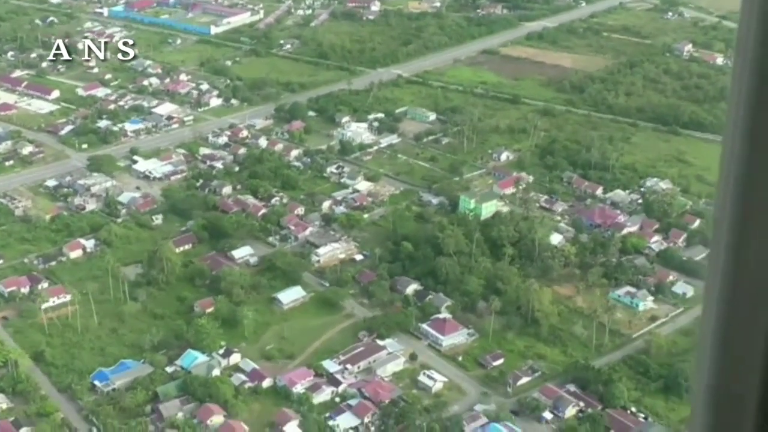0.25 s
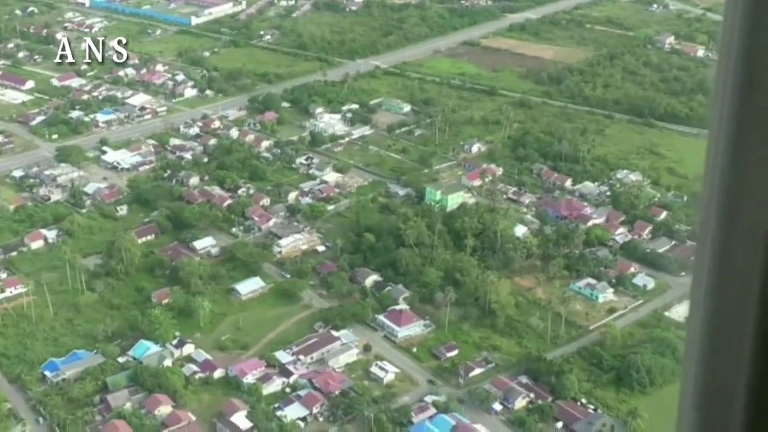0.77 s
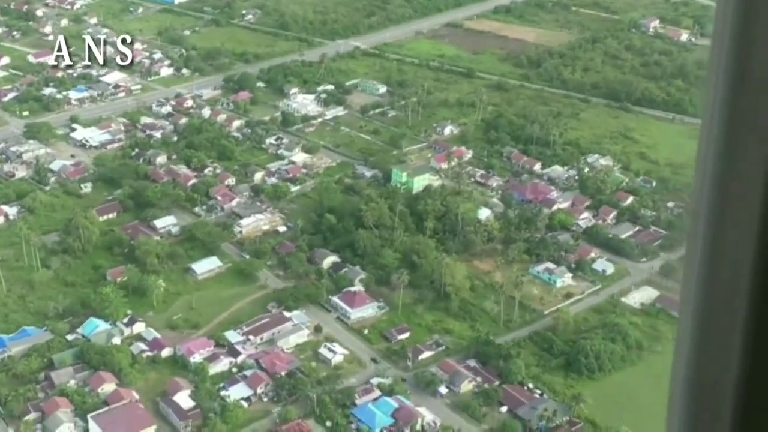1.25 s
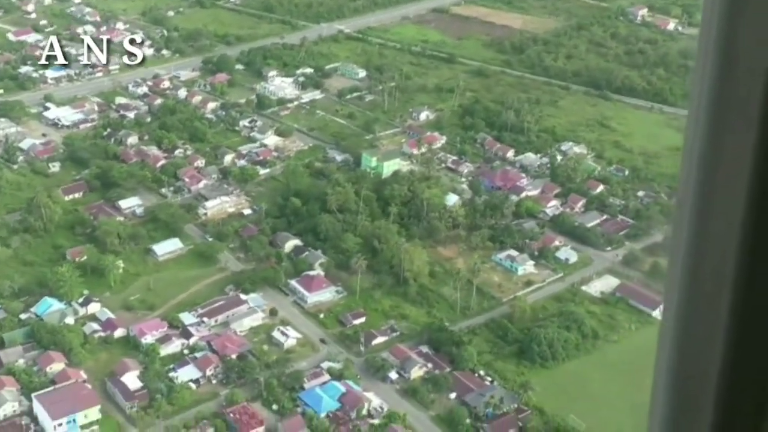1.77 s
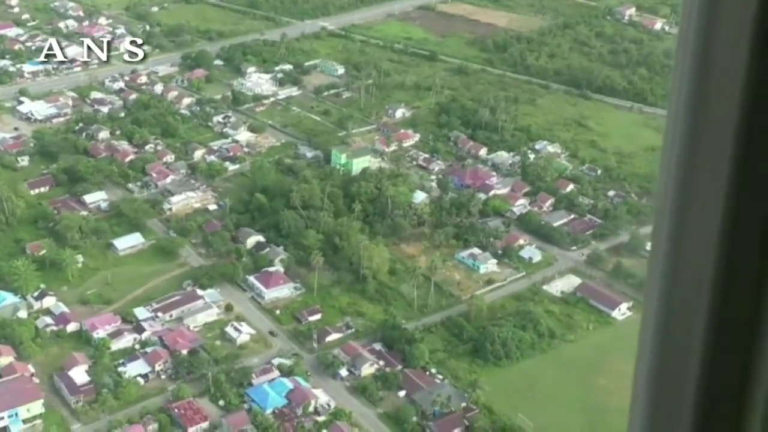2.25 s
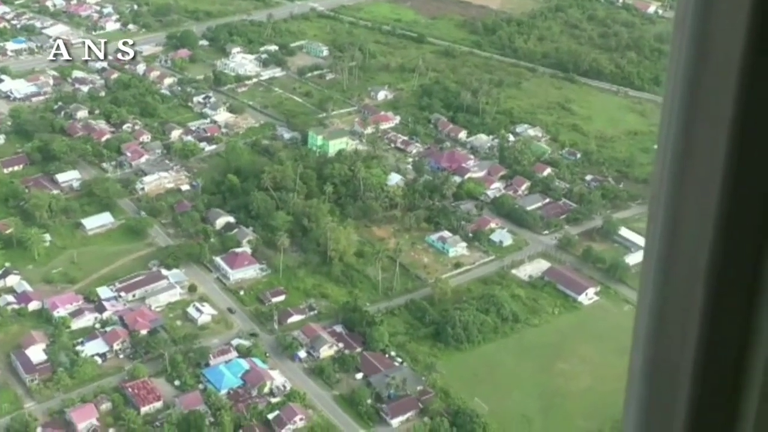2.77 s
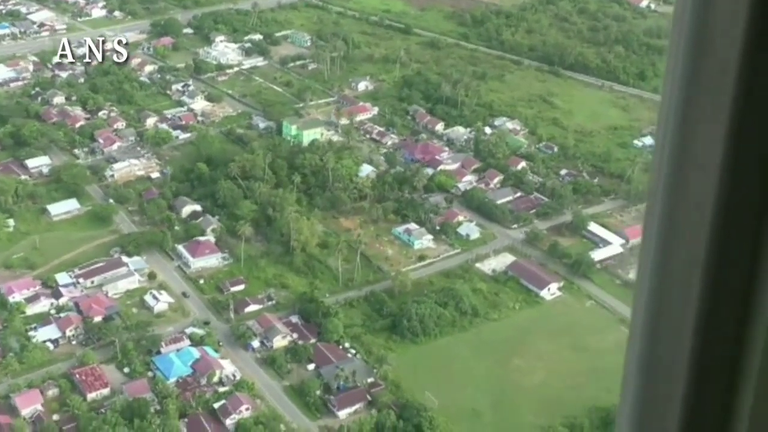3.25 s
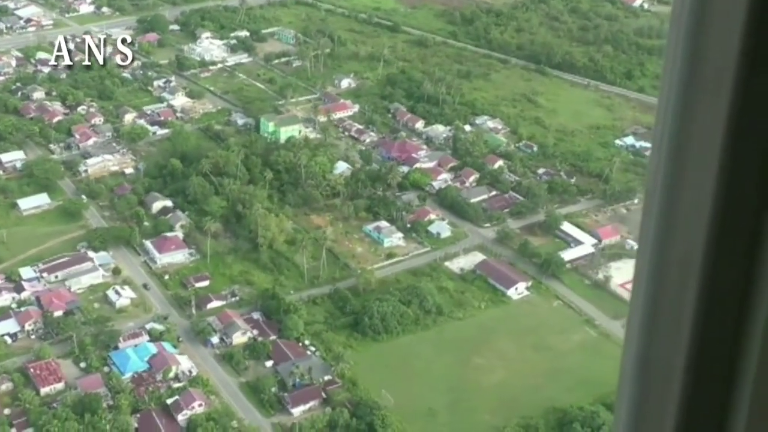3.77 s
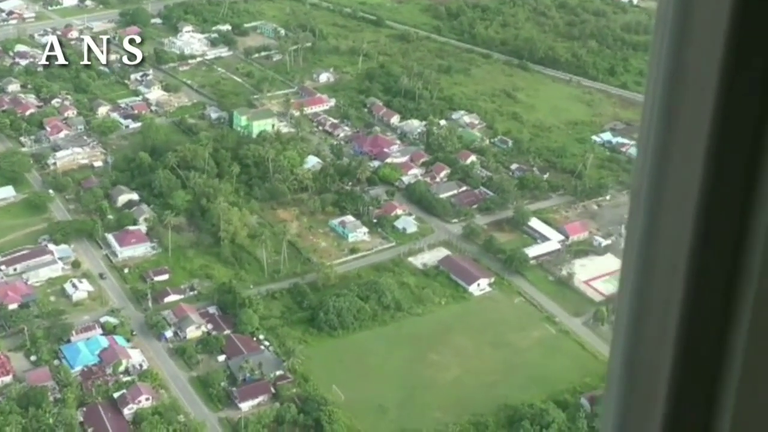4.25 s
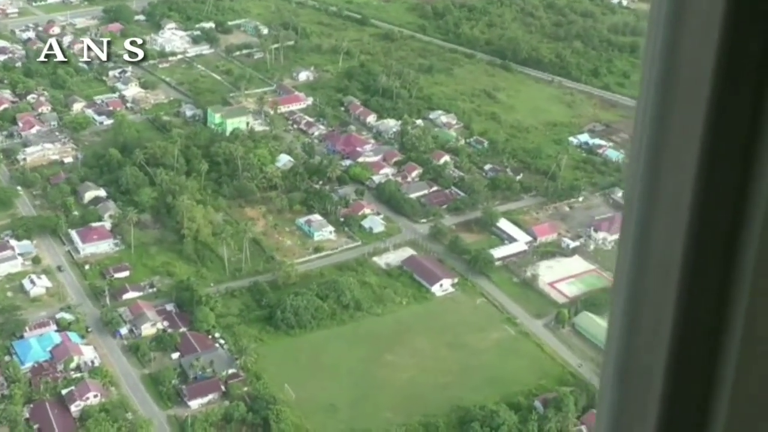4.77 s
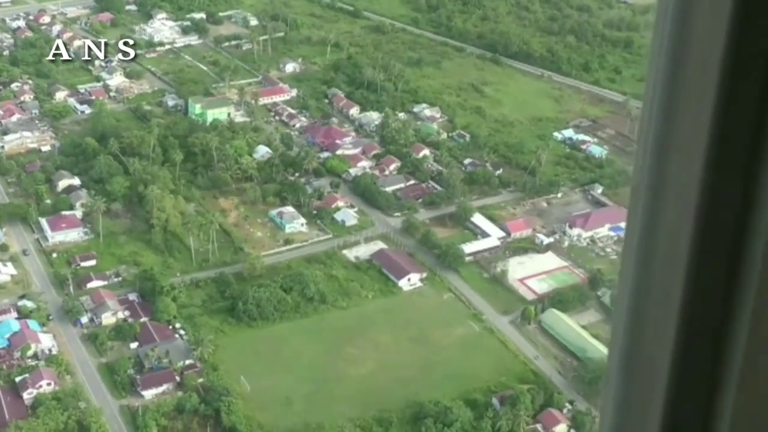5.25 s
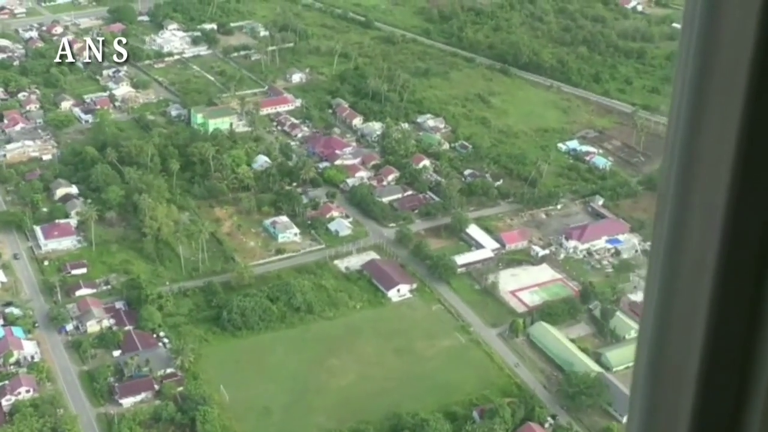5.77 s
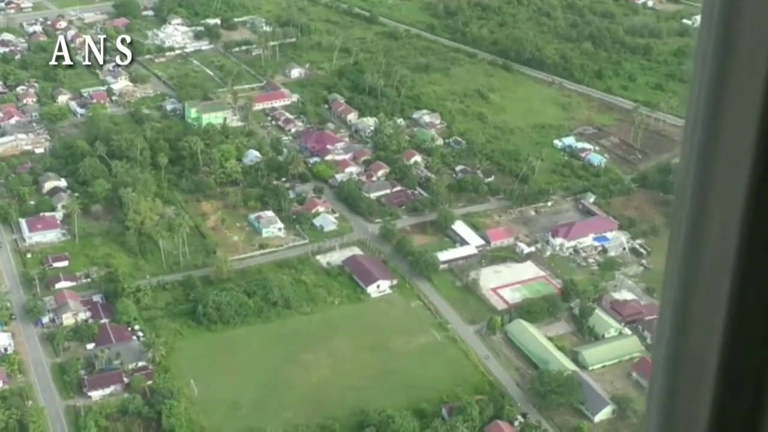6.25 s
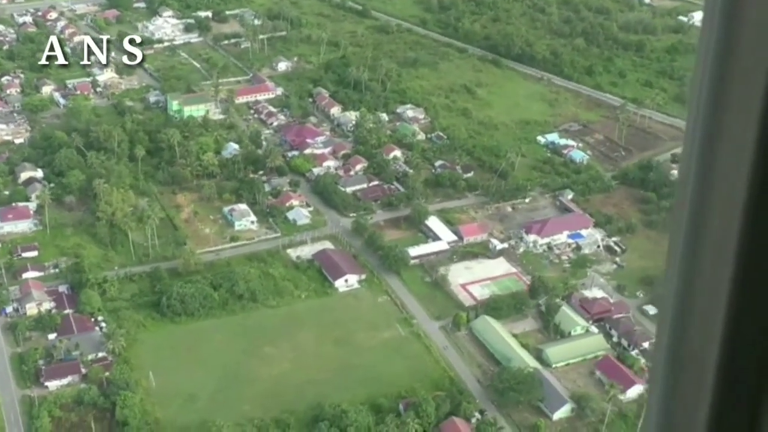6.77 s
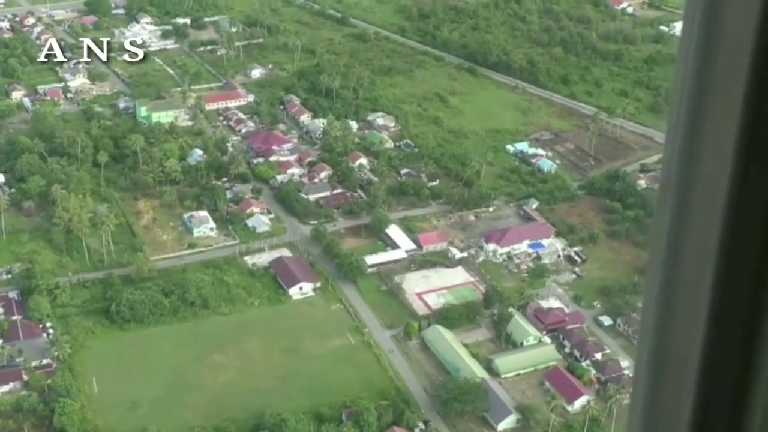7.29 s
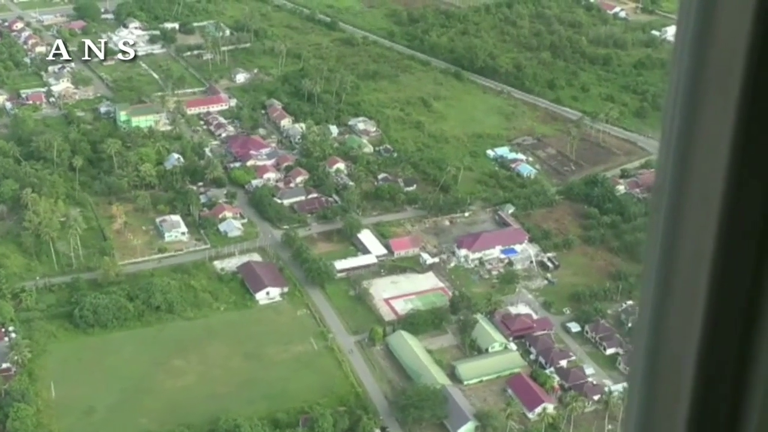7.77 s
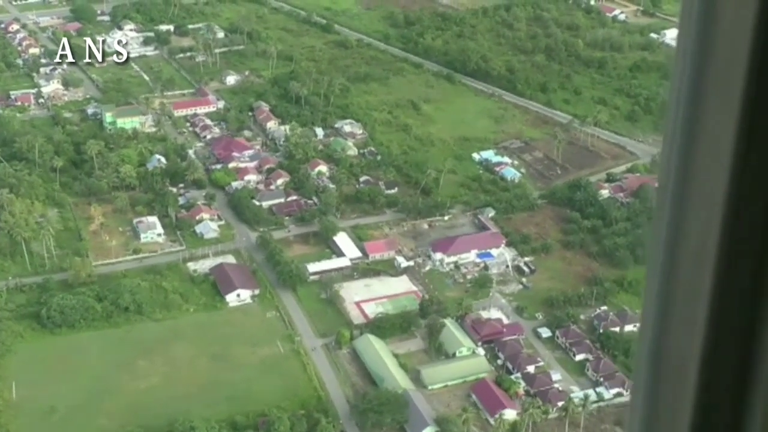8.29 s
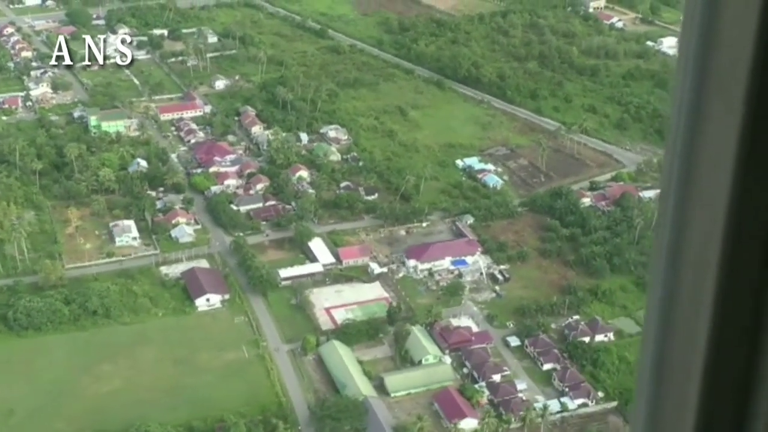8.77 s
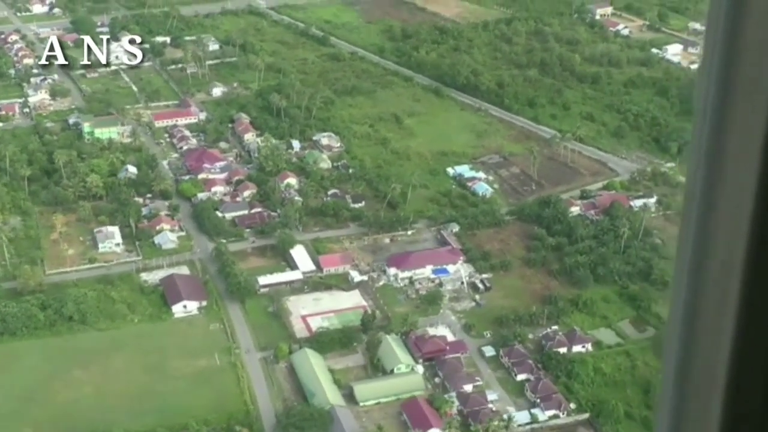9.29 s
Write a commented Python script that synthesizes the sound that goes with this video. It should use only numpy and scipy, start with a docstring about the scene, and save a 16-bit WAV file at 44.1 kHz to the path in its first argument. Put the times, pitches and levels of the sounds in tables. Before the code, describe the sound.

Inside a helicopter in level flight, a steady roar and low rotor throb carry on beneath high gear and turbine whines.

```python
"""Helicopter cabin in level flight

A close pair of microphones inside the cabin. Rotor, drive shaft and gears turn off one governed speed
and sing steady lines over the roar of air and structure. The turbine's compressor whines near 9 kHz
at its own speed, blurred by turbulent air, and its shaft adds a throbbing hum."""
import sys
import numpy as np
from scipy import signal
from scipy.io import wavfile
from scipy.ndimage import uniform_filter1d

SR = 44100
rng = np.random.default_rng(int(sys.argv[2]) if len(sys.argv) > 2 else 0)


def materialize(psi):
    """Save the field psi as 16-bit PCM at rate SR to the path in sys.argv[1].

    A 1-D psi becomes a single channel; in a 2-D psi each row is a channel.
    """
    bounded = np.clip(np.atleast_2d(psi).T, -1, 1)
    quanta = np.round(bounded * 32767).astype(np.int16)
    wavfile.write(sys.argv[1], SR, quanta)


N = 420273

# the compressor's blade tone at the microphones:
# (time [s], pitch [Hz], level [dB rms], left minus right [dB], left leads [rad])
COMPRESSOR_TONE = [(0.0, 8775, -45, 1, -2.8), (0.6, 8766, -41, 1, -4.3), (1.3, 8769, -45.5, -1, -5.2),
                   (1.95, 8786, -39.5, 5, -2.8), (2.3, 8786, -41.5, 2, -2.6), (2.6, 8786, -43, 3, -1.7),
                   (2.85, 8790, -38, 2, -2.8), (3.15, 8788, -39, 7, -2.7), (3.45, 8777, -42.5, 4, -1.7),
                   (3.65, 8769, -39, -4, -3.9), (4.0, 8770, -39.5, -1, -4.4), (4.6, 8781, -43, 5, -3.5),
                   (5.0, 8790, -35.5, 3.5, -3.2), (5.5, 8792, -35, -.5, -3), (5.8, 8793, -35, -1.5, -2.8),
                   (6.25, 8804, -38.5, 0, -2.8), (6.6, 8834, -41.5, 0, -2.6), (6.9, 8851, -40, 0, -2.8),
                   (7.26, 8843, -38.5, -7, -3.9), (7.6, 8826, -33.5, -5, -3.9),
                   (7.9, 8817, -33.5, -2, -3.7), (8.25, 8819, -32, -2.4, -3.4), (8.6, 8831, -38, -3, -3.4),
                   (8.9, 8839, -38.5, -5.5, -4.2), (9.25, 8838, -35.5, -1.5, -4.8),
                   (9.53, 8834, -43, -4, -4.4)]
DRONE_PAN_DB = -.4  # rotor and roar, left minus right


def gearbox(clock, sag, waver_db=.3):
    """The loud shaft and gear tones, locked to the drive speed, each swelling and dipping a little."""
    # (pitch [Hz], level midway [dB rms], slope [dB/s], change at full sag [dB],
    #  left minus right [dB], left lags [rad])
    tones = [(552.6, -32.1, -.05, 1.2, .9, 0), (650.66, -29.1, .3, -1, .7, -.1),
             (773.64, -34.8, 0, -2, -.6, 0), (1008.7, -31, .1, -2.6, -1, 0),
             (1513.1, -39.6, 0, -3.6, -1.5, -.1), (1547.3, -37.5, .1, -2.5, 0, 0),
             (1657.2, -39.6, -.35, -2.5, 1.5, -.1), (2017.4, -43.5, -.1, -8.5, 2.4, -.3),
             (2521.8, -55.3, -.1, -2.5, 1.6, 0), (2636.5, -57, -.75, 0, -1.5, .1),
             (3314.5, -52.5, .2, -7, 2.4, .1), (5960.2, -58.8, .2, -1, -.7, .3)]
    # brief swells and dips of single tones: (pitch [Hz], time [s], half length [s], lift [dB])
    swells = [(5960.2, 2.85, .5, 5.5), (1008.7, 7.6, .45, 2.5), (1008.7, 3.7, .5, -1.2),
              (1657.2, 6.55, .4, -3.5), (1657.2, 7.7, .35, 2.5), (1657.2, 5.6, .5, 1.5),
              (2017.4, 1.8, .25, -3), (2017.4, 3.8, .15, -4), (2017.4, 4.6, .35, 3), (2017.4, 6.8, .4, -3),
              (1547.3, 2.8, .4, 2), (1547.3, 5.5, .3, -1.5), (1547.3, 9.4, .3, 1.8), (1513.1, 2.8, .4, 1.5),
              (1513.1, 9.4, .3, 2), (552.6, 7.8, .35, -2.5), (773.64, 1.3, .35, 1.5),
              (773.64, 2.7, .35, 1.8), (773.64, 3.8, .7, -1.2), (773.64, 7.9, .5, 1.5),
              (3314.5, 3.4, .3, 3), (3314.5, 4.1, .3, 3)]
    out = np.zeros((2, N))
    for hz, mid_db, slope, sag_db, pan_db, lag in tones:
        db = mid_db + slope * (clock - N / SR / 2) + sag_db * sag + waver_db * wander(1.19)
        db += sum(lift_db * bell(clock, s, half) for at_hz, s, half, lift_db in swells if at_hz == hz)
        out += panned_tone(hz * clock + rng.random(), db, pan_db, -lag)
    return out


def main_gear(clock, whine_hz=3205.1):
    """The whine of the main gear, moving between the microphones."""
    # (time [s], left level [dB rms], right level [dB rms], left leads [rad])
    whine = [(0.0, -34.5, -36.5, -1.3), (1.6, -34.5, -37, -1.45), (2.25, -37, -44, -2.5),
             (2.6, -37, -39.5, -2.8), (2.85, -34.5, -39.5, -1.85), (3.5, -38, -40, -2.4),
             (4.35, -38, -40, -2.9), (4.55, -35.5, -45, -2.3), (5.0, -36, -44, -2.0),
             (5.5, -35.5, -45, -2.0), (5.9, -37, -41.5, -1.9), (6.6, -37, -39, -2.0),
             (7.3, -33.5, -46.5, -1.4), (8.0, -36, -44, -2.7), (8.6, -35.5, -43.5, -2.1),
             (9.53, -36.5, -38.5, -2.1)]
    return tone(whine_hz * clock, *columns(whine))


def rotor_beats(clock, in_step_s=.3108):
    """Two blade harmonics beat twice a second with shaft tones just above them."""
    # (pitch [Hz], level midway [dB rms], slope [dB/s])
    beating_tones = [(108.43, -37, -.6), (110.52, -28.5, 0), (130.12, -45, -.9), (132.2, -40.5, 0)]
    out = np.zeros((2, N))
    for hz, mid_db, slope in beating_tones:
        db = mid_db + slope * (clock - N / SR / 2)
        out += panned_tone(hz * (clock - in_step_s), db, DRONE_PAN_DB)
    return out


def rotor_thump(clock, blade_hz=10.843, pass_s=.083, smear_turns=.05):
    """Harmonics of 10.84 Hz nearly in step: the even ones make one thump per blade pass, the odd ones belong to
    the tail rotor, all smeared by the cabin."""
    # (multiple of 10.84 Hz, half the blade-pass rate, level [dB rms])
    harmonics = [(2, -56), (3, -55), (4, -40), (5, -52), (7, -47), (8, -37), (9, -54), (11, -56), (13, -40),
                 (14, -45), (15, -46), (16, -42), (17, -46), (18, -43), (19, -52), (20, -39), (22, -42),
                 (24, -44), (25, -49), (26, -48), (28, -47), (30, -50)]
    # phase shifts of even harmonics near 122 and 190 Hz that shape the thump:
    # (centre [Hz], half width [Hz], phase [turns])
    phase_bends = [(122, 38, .72), (190, 30, -.28)]
    out = np.zeros((2, N))
    for k, db in harmonics:
        drift_db = db + .58 * wander(1.44)
        turns = k * blade_hz * (clock - pass_s) - .2  # the offset makes the thump a drop in pressure
        turns += smear_turns * rng.standard_normal()
        if k % 2:
            turns += .7 - .04 * k  # odd harmonics come turned and a little late
        else:
            turns += sum(turn * bell(k * blade_hz, hz, width) for hz, width, turn in phase_bends)
        out += panned_tone(turns, drift_db, DRONE_PAN_DB)
    return out


def faint_machinery(clock, shaft_hz=55.26, waver_db_per_decade=.8):
    """Quieter lines of the drive shaft, pumps, fans and gears, drifting slowly in level."""
    # (multiple of the shaft rate, level [dB rms], left minus right [dB], left lags [rad])
    shaft = [(4, -47, -0.4, 0.0), (5, -37, -0.7, -0.1), (6, -45, -0.5, 0.0), (12, -46, -0.1, 0.0),
             (18, -51, -0.9, -0.1), (20, -52, -0.4, -0.1), (26, -56, -0.0, 0.2), (42, -59, 6.4, 0.1),
             (56, -56, 4.8, -1.0), (64, -68, 0, -0.3), (62, -67, -2.5, -0.1), (70, -68, -1.3, -0.6),
             (84, -64, -4.7, -0.5), (90, -69, 0, -0.3), (112, -69, -2.5, -0.5), (116, -70, 0, -0.3)]
    # slower shafts, pumps and fans, and a sideband of the shaft tone near 121 Hz: (pitch [Hz], level [dB rms],
    # left minus right [dB])
    hums = [(55.62, -49, -0.1), (121.36, -45, -0.4), (139.35, -39, -0.4), (278.1, -44, -0.6),
            (301.3, -43, -1.9), (333.7, -42, -0.1), (346.0, -49, -0.3), (368.6, -47, -0.3),
            (374.1, -46, -0.2), (445.0, -47, -0.1), (472.9, -46, -0.2), (504.4, -46, -0.5),
            (602.6, -42, -0.4)]
    # (pitch [Hz], level [dB rms], left minus right [dB], left lags [rad])
    gears = [(1013.3, -51, 0.4, -0.1), (1234.4, -53, 0.6, 0.3), (1301.3, -56, -2.1, 0.0),
             (1358.4, -56, 0.8, 0.0), (1581.9, -48, -0.7, -0.1), (1825.8, -56, 0.7, -0.1),
             (1828.3, -56, -5.1, -0.1), (1883.9, -57, -0.9, -0.6), (1939.2, -61, 1.1, 0.2),
             (1942.0, -56, 0.4, 0.1), (1999.9, -58, 0.0, 0.3), (2009.1, -53, 0.1, 0.3),
             (2618.5, -58, 3.3, 0.1), (2739.8, -62, -1.6, 0.4), (3026.2, -63, -1.9, 0.3),
             (3065.8, -66, 3.5, -0.3), (3272.0, -65, 0.5, -0.2), (5414, -72, 0, -0.3), (5482, -72, 0, -0.3),
             (5826.3, -65, -1.5, -0.8), (6028.5, -68, -0.5, -0.5), (6094.1, -68, -0.2, -0.5)]
    lines = [(k * shaft_hz, *rest) for k, *rest in shaft] + [(*row, 0) for row in hums] + gears
    out = np.zeros((2, N))
    for hz, db, pan_db, lag in lines:
        waver_db = waver_db_per_decade * np.log10(hz / 20)  # short waves feel every shift of the cabin
        drift_db = db + waver_db * wander(1.185)
        out += panned_tone(hz * clock + rng.random(), drift_db, pan_db, -lag)
    return out


def compressor_whine(flutter_db=1.0):
    """The thin tone of the compressor blades, fluttering separately in each microphone."""
    hz, db, pan_db, lead = columns(COMPRESSOR_TONE)
    left_db = db + pan_db / 2 + flutter_db * wander(25)
    right_db = db - pan_db / 2 + flutter_db * wander(25)
    return tone(np.cumsum(hz) / SR, left_db, right_db, lead)


def compressor_haze(blade_hz, ripple_db=1.5, core_hz=150):
    """Turbulence spreads the blade tone into gliding noise, partly opposite in the two microphones."""
    # nested bands: (offset from the tone [Hz], width [Hz], share [dB])
    bands = [(-35, 173, -30.5), (5, 670, -34), (-220, 80, -54), (290, 140, -46), (-430, 140, -50),
             (0, 1400, -46)]
    # (time [s], base left-right likeness [-1 to 1], left minus right [dB], level [dB])
    at_microphones = [(0, -0.59, -1, -33), (1.25, -0.29, -1.5, -32.5), (1.7, -0.54, -1, -31.5),
                      (2.25, -0.56, -1, -34.5), (2.85, -0.45, 1.9, -32), (3.2, -0.51, 1, -33),
                      (4.5, -0.57, 0.5, -33.5), (5.2, -0.7, 1, -32.5), (6.5, -0.68, -2, -33),
                      (7.7, -0.59, -1, -34), (9.53, -0.53, -2.5, -35)]
    base_likeness, pan_db, db = columns(at_microphones)
    f, centre = np.fft.rfftfreq(2048, 1 / SR)[:, None], per_frame(blade_hz)
    power = sum(gain_of(2 * share_db) * 4 / (np.pi * width)
                / (1 + (2 * (f - centre - offset) / width) ** 2) ** 2
                for offset, width, share_db in bands)
    standing_waves = mottle(power.shape, bins=4, frames=120, mode="wrap")
    power *= gain_of(2 * ripple_db * standing_waves)
    magnitude = np.sqrt(power / power.sum(0) / f[1])  # unit power in every frame
    likeness = per_frame(base_likeness) - .065 + .285 * bell(f, centre, core_hz)
    haze = noise(magnitude, likeness, turn_rad=.38)
    return gain_of(db + np.array([pan_db, -pan_db]) / 2 + .7 * wander(9)) * haze


def compressor_shaft(blade_hz, blades=16, throb_s=1.24, peak_s=.72, depth=.75):
    """The shaft hums at one cycle a turn, throbs, and beats with the gearbox tone beside it."""
    t = np.arange(N) / SR
    db = -41.5 - .3 * (t - N / SR / 2)  # a slow fade
    throb = 1 + depth * np.cos(2 * np.pi * (t - peak_s) / throb_s)
    return throb * tone(np.cumsum(blade_hz) / SR / blades + rng.random(), db, db)


def roar(patchy_db=1.7, ripple_db=1.7, buffet_db=1.2):
    """Wide roar of air and structure, with bands of hiss around the gear tones and hollows between."""
    # (frequency [Hz], density [dB per Hz])
    spectrum = [(20, -63), (40, -77), (70, -52), (140, -45), (250, -48.5), (500, -53), (900, -57),
                (1400, -62), (2200, -71.5), (3000, -76), (4500, -78), (7000, -79), (10500, -80),
                (12500, -89), (14500, -100)]
    # (centre [Hz], width [Hz], lift or dip [dB])
    humps_and_dips = [(115.5, 32, -4), (283.5, 48, -10.5), (413, 74, -4), (674, 480, 2.), (841, 69, -4.5),
                      (1680, 200, 2), (1755, 120, -4.5), (2550, 270, 5), (3203, 230, 7.5), (3900, 1050, 2.),
                      (5340, 150, -3), (5635, 190, 2.5), (10800, 200, -15)]
    # (frequency [Hz], left-right likeness [-1 to 1])
    likeness = [(50, .988), (100, .98), (160, .993), (500, .986), (800, .945), (1300, .9), (1800, .8),
                (2300, .76), (2900, .65), (6000, .58), (7500, .35), (9000, -.2), (11500, -.05)]
    f, frames = np.fft.rfftfreq(2048, 1 / SR), N // 512 + 5
    shape_db = read(spectrum, f) + sum(db * bell(f, hz, width / 2) for hz, width, db in humps_and_dips)
    treble = np.clip(np.log10(f / 600 + 1), 0, 1)[:, None]  # short waves are broken up most
    patches = mottle((len(f), frames), bins=16, frames=8)
    standing_waves = mottle((len(f), frames), bins=3, frames=300, mode="wrap")
    gusts = wander(8)[np.minimum(np.arange(frames) * 512, N - 1)]
    field_db = shape_db[:, None] + treble * (patchy_db * patches + ripple_db * standing_waves)
    field_db += (1 - treble) ** 2 * buffet_db * gusts
    out = noise(gain_of(field_db), read(likeness, f)[:, None], turn_rad=-.11 * treble)
    return gain_of(np.array([[DRONE_PAN_DB], [-DRONE_PAN_DB]]) / 2) * out


def gain_of(db):
    """Decibels to an amplitude factor."""
    return 10 ** (np.asarray(db) / 20)


def bell(x, centre, half_width):
    """A Gaussian bump of height one."""
    return np.exp(-((x - centre) / half_width) ** 2)


def read(points, hz):
    """A spectrum table interpolated on a log-frequency axis."""
    f, value = np.transpose(points)
    return np.interp(np.log(hz + 1), np.log(f + 1), value)


def columns(rows):
    """Every value column of a time table at each sample."""
    times, *values = np.transpose(rows)
    return [np.interp(np.arange(N) / SR, times, value) for value in values]


def per_frame(curve):
    """One value for each noise frame, held at the end."""
    return np.append(curve[::512], [curve[-1]] * 4)


def wander(rate_hz):
    """Random drift of unit size, no faster than rate_hz."""
    t = np.arange(0, N + 512, 512) / SR
    f = np.geomspace(rate_hz / 10, rate_hz, 8)[:, None]
    drift = np.sin(2 * np.pi * (f * t + rng.random((8, 1)))).sum(0) / 2
    return np.interp(np.arange(N) / SR, t, drift)


def mottle(shape, bins, frames, mode="reflect"):
    """A random pattern of unit size, smoothed over frequency and time."""
    pattern = uniform_filter1d(rng.standard_normal(shape), bins, axis=0)
    pattern = uniform_filter1d(pattern, frames, axis=1, mode=mode)
    return pattern / pattern.std()


def tone(turns, left_db, right_db, lead=0):
    """One sine in both microphones, the left ahead by lead radians."""
    phase = 2 * np.pi * turns
    left, right = gain_of(left_db) * np.sin(phase + lead), gain_of(right_db) * np.sin(phase)
    return np.sqrt(2) * np.array([left, right])


def panned_tone(turns, db, pan_db, lead=0):
    """A sine that is pan_db louder on the left than on the right."""
    return tone(turns, db + pan_db / 2, db - pan_db / 2, lead)


def noise(magnitude, likeness, turn_rad):
    """Stereo noise from magnitudes (bins x frames), the shared part turned in phase on the right."""
    a, b, c, d = rng.standard_normal((4,) + magnitude.shape)
    likeness = np.clip(likeness, -1, 1)
    left = a + 1j * b
    right = likeness * np.exp(1j * turn_rad) * left + np.sqrt(1 - likeness ** 2) * (c + 1j * d)
    _, out = signal.istft(np.array([left, right]) * magnitude, nperseg=2048, noverlap=1536)
    return np.sqrt(3 * SR / 2048) / 2 * out[:, :N]  # a magnitude of one gives unit power per Hz


def scene():
    """Drivetrain, compressor and roar as they reach the pair in the cabin."""
    # the governed drive: (time [s], speed [share of nominal], sag in level of the loud tones [0-1])
    drive = [(0.0, 1.00054, 0), (1.5, 0.99985, .1), (2.0, 0.9999, .3), (2.5, 1.0, .1), (3.0, 1.00017, .2),
             (4.0, 0.99955, .5), (4.5, 0.99955, .2), (5.0, 0.99979, .3), (5.5, 0.99976, .8),
             (6.0, 0.99904, .85), (6.5, 0.99898, 1), (7.0, 0.9999, .95), (7.5, 0.99993, .6),
             (8.0, 0.99906, .45), (8.5, 0.99912, .3), (9.53, 0.99976, .1)]
    speed, sag = columns(drive)
    clock = np.cumsum(speed) / SR  # time as the drive counts it
    drivetrain = gearbox(clock, sag) + main_gear(clock)
    drivetrain += rotor_beats(clock) + rotor_thump(clock) + faint_machinery(clock)
    blade_hz = columns(COMPRESSOR_TONE)[0]
    compressor = compressor_whine() + compressor_haze(blade_hz) + compressor_shaft(blade_hz)
    return drivetrain + compressor + roar()


def record(dry):
    """The recorder's band limit, a steep cut near 15 kHz."""
    lowpass = signal.firwin(2047, 14970, window=("kaiser", 9), fs=SR)
    return signal.oaconvolve(dry, lowpass[None], "same")


dry = scene()
out = record(dry)
materialize(out)
```